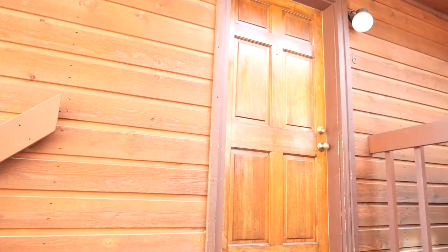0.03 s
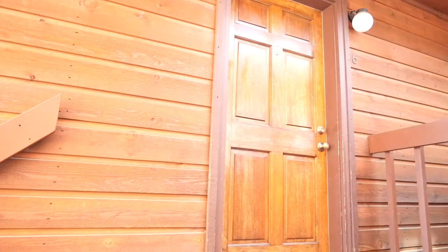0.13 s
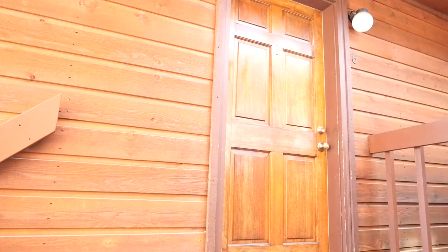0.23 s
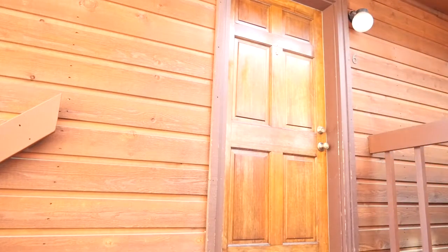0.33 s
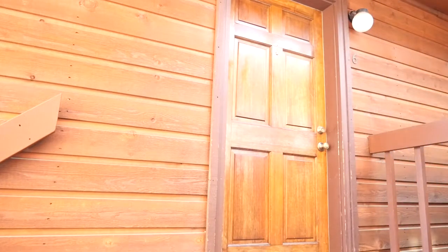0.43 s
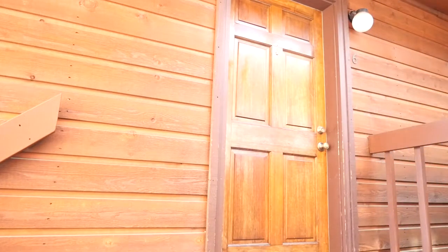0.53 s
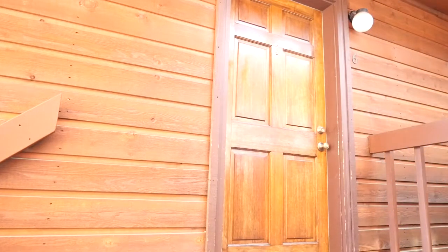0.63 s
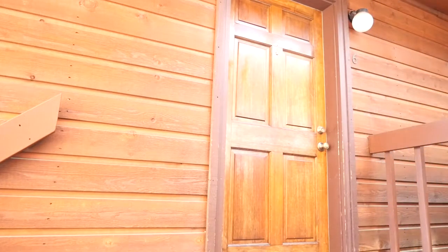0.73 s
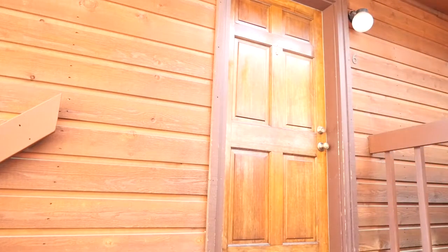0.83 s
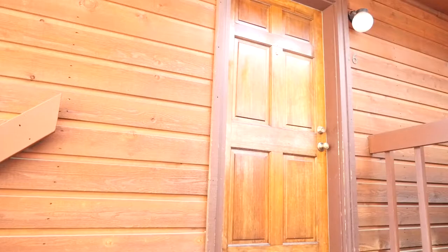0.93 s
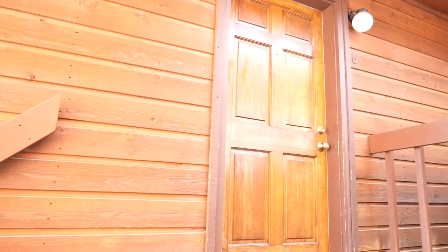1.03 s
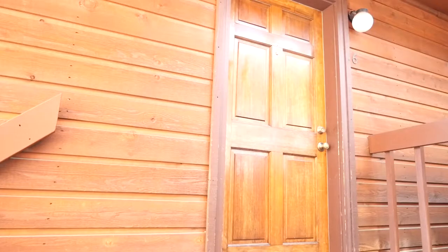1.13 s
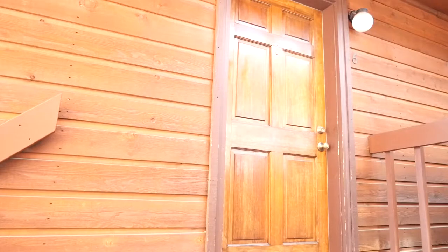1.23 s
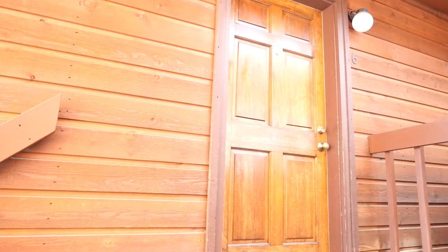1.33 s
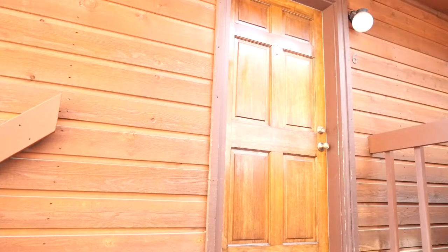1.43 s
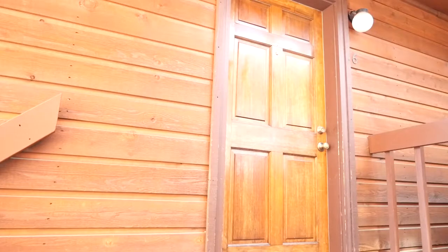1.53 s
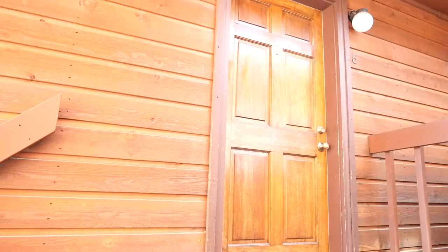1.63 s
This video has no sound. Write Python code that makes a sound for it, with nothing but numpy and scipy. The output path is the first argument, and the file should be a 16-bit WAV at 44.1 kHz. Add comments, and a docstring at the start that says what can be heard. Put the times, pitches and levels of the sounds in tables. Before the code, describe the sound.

One hard knock on a wooden front door at 0.2 seconds, close and loud enough to distort, its panels ringing briefly and latch chattering. Faint metallic clicks precede it from the start. A quieter grainy, rattling scrape runs from about 0.4 to 0.65 seconds. Soft muffled thumps and scuffs follow near 1.0, 1.2 and 1.5 to 1.7 seconds, over low steady noise and faint hum.

```python
"""One hard blow on a wooden door overloads the recorder: ringing tones for the panels, noise bursts for cracks and porch.
Just after it the latch chatters, as short bursts of noise each around one pitch.
Light metallic clicks come before the blow and again near the end; a grainy, rattling scrape follows the blow.
Soft thumps, one at the start and the rest late, and late scuffs are shaped noise; one thump leaves a hollow note.
Under it all lie a low steady noise, a faint wavering hum and two slight puffs of air."""
import sys
import numpy as np
from scipy import signal
from scipy.fft import rfft, irfft
from scipy.io import wavfile

SR = 44100
rng = np.random.default_rng(int(sys.argv[2]) if len(sys.argv) > 2 else 0)


def wav_record(signal):
    """Record a signal, one row per channel, as 16-bit PCM in the file named by sys.argv[1]."""
    frames = np.transpose(np.atleast_2d(signal))
    bounded = np.clip(frames, -1, 1)
    # unit amplitude maps onto the largest positive 16-bit level
    quanta = np.round(bounded * 32767).astype(np.int16)
    wavfile.write(sys.argv[1], SR, quanta)


N = 74970

# In every table, rise is the time to full strength and t60 the time to fade by 60 dB.
# Levels are those before the recorder's gain; spectrum levels only set the balance between pitches.

# blows on the door: (time [s], level [dB])
DOOR_BLOWS = [(.2110, 0), (0.2148, -9), (0.241, -15.5), (0.2492, -11.5)]
# tones of the ringing panels: (frequency [Hz], level before PANELS_DB [dB], t60 [s])
PANEL_TONES = [(238.7, -9.5, .25), (335, -6, .5), (404, -4.5, 0.48), (433, -7, .4), (523, -7.5, .35),
               (617, 2, .26), (650, -10, 0.78), (771, 0.5, .5), (800, -3, .5), (821, -4.5, 0.82),
               (912, -5, 0.76), (1020, -18, 0.29), (1256, -20, 1), (1567, -16, 0.54), (2262, -19, .3)]
# spectrum of the wood's crack: (frequency [Hz], level [dB])
CRACK_SPECTRUM = [(20, -65), (90, -41.5), (170, -17), (300, 0.5), (700, 1.5), (1400, -1), (2200, -7),
                  (4000, -27), (15000, -48)]
# spectrum of the porch ringing after the blow: (frequency [Hz], level [dB])
PORCH_SPECTRUM = [(20, -71), (100, -32.5), (160, -19.5), (280, -12), (390, -7), (500, -9), (690, -12.5),
                  (810, -8.5), (1140, -15), (1700, -21), (2800, -21), (3200, -14.5), (4000, -27),
                  (5500, -26.5), (7800, -26.5), (11000, -31.5), (15000, -39.5)]
# strikes of the latch: (time [s], level [dB], centre frequency [Hz])
LATCH_STRIKES = [(.2143, -9.5, 9800), (0.2216, -10, 3330), (0.2206, -7.5, 6850), (0.2256, -9, 5370)]
# light clicks of the hardware: (time [s], level [dB], brightness [dB per octave])
METAL_CLICKS = [(0.0, -35, -4), (.029, -40, -1.5), (0.065, -41, 0), (0.0898, -30, 1.5), (0.15, -40, 0.5),
                (0.159, -37.5, -2.5), (1.528, -44, -10), (1.665, -46, -11)]
# spectrum of the clicking metal: (frequency [Hz], level [dB])
METAL_SPECTRUM = [(10, -88.5), (300, -30.5), (900, -6.5), (1450, -7), (2000, -7), (3000, 1.5), (3450, -1.5),
                  (4300, -10), (6000, -4.5), (7100, -6.5), (9500, -14.5), (11200, -12.5), (13000, -19.5),
                  (15500, -20.5)]
# strokes of the scrape: (time [s], level [dB], rise [s], t60 before the release [s])
SCRAPE_STROKES = [(0.406, -22.5, 0.032, .5), (.453, -25, 0.007, 0.23), (0.509, -30, .01, 0.39),
                  (0.561, -34, 0.0049, 0.37)]
# spectrum of the scrape: (frequency [Hz], level [dB])
SCRAPE_SPECTRUM = [(150, -42), (320, 0.5), (550, -10), (920, -0.5), (1300, -8.5), (1900, -14.5),
                   (2600, -7.5), (3400, -7.5), (4400, -19.5), (5500, -15), (6000, -15.5), (6500, -17),
                   (8200, -16.5), (9500, -25.5), (11000, -22.5), (15500, -34)]
# narrow rings of rubbed hardware and wood: (time [s], level [dB], rise [s], t60 [s], pitch [Hz])
RUBBED_RINGS = [(0.0, -41.5, 0.011, .35, 3200), (.148, -40.5, .015, .2, 3450),
                (0.44, -36, 0.018, 0.4, 5960), (0.478, -43.5, 0.14, 0.25, 6080),
                (.44, -29, 0.017, 0.2, 3400), (0.456, -37, 0.048, 0.52, 3450),
                (.415, -28, 0.011, 0.26, 1000), (0.51, -40, 0.09, 0.33, 800),
                (0.485, -37, 0.083, 0.41, 318), (1.505, -50, 0.024, 0.42, 3550),
                (1.66, -44, 0.0083, 0.11, 2750)]
# soft far thumps: (time [s], level [dB], rise [s], t60 [s], brightness [dB per octave])
FAR_THUMPS = [(0.0, -35, 0.0024, 0.28, 0), (1.019, -33, 0.016, 0.46, 1), (1.192, -34, 0.0076, 0.31, -3.5),
              (1.515, -37, 0.0098, 0.63, 1.5), (1.57, -35, .008, 0.34, 2.5), (1.665, -45, .01, .4, 5.5)]
# spectrum of the thumps: (frequency [Hz], level [dB])
THUMP_SPECTRUM = [(20, -45.5), (70, -17.5), (140, -4.5), (350, 6), (620, -7.5), (900, 0.5), (1250, -10.5),
                  (2500, -28), (5000, -40.5), (15000, -61)]
# far scuffs: (time [s], level [dB], rise [s], t60 [s])
FAR_SCUFFS = [(1.02, -57, .04, .6), (1.16, -49, 0.031, .35), (1.475, -47.5, 0.028, .5),
              (1.515, -48, .015, 0.83), (1.65, -48.5, 0.021, .7)]
# spectrum of the scuffs: (frequency [Hz], level [dB])
SCUFF_SPECTRUM = [(500, -21), (1500, 4), (2600, 1.5), (3700, -1), (5000, -5.5), (7000, -12.5),
                  (10000, -15.5), (15000, -20)]
# hollow note that swells from one far thump: (time [s], level [dB])
HOLLOW_SWELL = [(1.015, -69), (1.045, -36), (1.078, -30), (1.1, -45.5), (1.17, -69)]
# spectrum of the steady background: (frequency [Hz], level [dB])
BACKGROUND_SPECTRUM = [(12, -26.5), (20, 4), (38, -10.5), (64, -10.5), (85, -10.5), (140, -8.5), (238, -5),
                       (306, -15.5), (393, -9), (519, -13.5), (565, -11), (857, -12.5), (1070, -15),
                       (1160, -19), (1580, -25), (1820, -25.5), (2610, -29), (2920, -31.5), (15500, -52.5)]
# faint hum: (frequency [Hz], level [dB])
HUM_BANDS = [(59, -54), (130, -51), (152, -52), (880, -51.5)]
# puffs of air on the microphone: (time [s], level [dB], rise [s], t60 [s])
AIR_PUFFS = [(.33, -38, 0.024, .4), (1.03, -39, 0.084, 0.7)]
# spectrum of a puff: (frequency [Hz], level [dB])
PUFF_SPECTRUM = [(5, -3), (18, 1), (35, -7), (70, -13), (200, -50), (2000, -92)]

CRACK_DB, CRACK_T60_S = -3.5, 0.042
PANELS_DB = -15
PORCH_DB, PORCH_RISE_S, PORCH_T60_S = -11.5, 0.0061, 0.57
DOOR_LOW_HZ = 210  # the door's sound is cut below this
LATCH_T60_S, LATCH_OCTAVES = 0.015, 0.34
CLICK_T60_S, CLICK_SNAP_DB = 0.31, -2
GRAIN_DB, GRAIN_PER_S = 0.5, 740  # typical size and rate of the uneven catching
SCRAPE_STOP_S, SCRAPE_RELEASE_T60_S = 0.642, 0.7
RING_OCTAVES = .033
HOLLOW_HZ = 447
BACKGROUND_DB = -42
DRIVE_DB, TOP_HZ = 1, 15700  # the recorder's gain and upper limit

T = np.arange(N) / SR  # time of each sample [s]
FREQS = np.maximum(np.fft.rfftfreq(N, 1 / SR), 1)  # kept above zero for the logarithms

# peaks and dips of many small resonances: depth, spacing, and the pitch below which they shrink
RIPPLE_DB, RIPPLE_HZ, RIPPLE_FROM_HZ = 2, 29.89, 1300
RIPPLE = np.interp(FREQS / RIPPLE_HZ, np.arange(4000), rng.standard_normal(4000))
RIPPLE = RIPPLE * np.minimum(FREQS / RIPPLE_FROM_HZ, 1) ** 2


def amp(db):
    """Turn decibels into a multiplier."""
    return 10 ** (np.asarray(db) / 20)


def noise(db):
    """Noise of average strength (rms) 1, with the given balance of frequencies."""
    x = irfft(rfft(rng.standard_normal(N)) * amp(db), N)
    return x / x.std()


def colour(points, tilt_db=0, ripple_db=0):
    """Dense resonances: noise that follows a spectrum table, tilted per octave and rippled."""
    hz, db = np.array(points).T
    smooth = np.interp(np.log(FREQS), np.log(hz), db)
    return noise(smooth + tilt_db * np.log2(FREQS) + ripple_db * RIPPLE)


def band(hz, octaves):
    """Noise gathered around one resonance."""
    distance = np.log2(FREQS / hz) / octaves
    return noise(-20 * np.log10(1 + distance ** 2))


def envelope(start, rise, t60):
    """A straight rise, then a smooth fade of 60 dB in t60 seconds."""
    age = T - start
    attack = np.clip(age / max(rise, 1e-4), 0, 1)
    return attack * np.exp(-np.log(1000) * np.maximum(age - rise, 0) / t60)


def grain():
    """Quick uneven catching of two rubbing surfaces, as random changes of level."""
    wobble = np.interp(T * GRAIN_PER_S, np.arange(N), rng.standard_normal(N))
    gain = amp(GRAIN_DB * wobble)
    return gain / np.sqrt(np.mean(gain ** 2))


def door():
    """Each blow cracks the wood; the first sets the panels and the porch ringing."""
    start = DOOR_BLOWS[0][0]
    cracks = sum(amp(CRACK_DB + db) * envelope(s, 0.00046, CRACK_T60_S) * colour(CRACK_SPECTRUM)
                 for s, db in DOOR_BLOWS)
    # each tone starts at a peak, pushed up or down at random
    panels = sum(amp(db) * rng.choice([-1, 1]) * np.cos(2 * np.pi * hz * (T - start))
                 * envelope(start, .001, t60) for hz, db, t60 in PANEL_TONES)
    porch = envelope(start, PORCH_RISE_S, PORCH_T60_S) * colour(PORCH_SPECTRUM, ripple_db=RIPPLE_DB)
    mix = cracks + amp(PANELS_DB) * panels + amp(PORCH_DB) * porch
    low_cut = signal.butter(3, DOOR_LOW_HZ, "high", fs=SR, output="sos")
    return signal.sosfilt(low_cut, mix)


def latch():
    """The latch strikes its plate several times just after the blow, each strike near one pitch."""
    return sum(amp(db) * envelope(s, .0004, LATCH_T60_S) * band(hz, LATCH_OCTAVES)
               for s, db, hz in LATCH_STRIKES)


def clicks():
    """Small metal contacts: a snap and its ring in the porch."""
    total = 0
    for s, db, tilt in METAL_CLICKS:
        ring = envelope(s, 0.0024, CLICK_T60_S)
        snap = amp(CLICK_SNAP_DB) * envelope(s, 0.00067, 0.0053)
        total = total + amp(db) * (ring + snap) * colour(METAL_SPECTRUM, tilt, RIPPLE_DB)
    return total


def scrape():
    """Grainy strokes that fade faster once the motion stops, with narrow rings of rubbed parts."""
    strokes = sum(amp(db) * envelope(s, rise, t60) * colour(SCRAPE_SPECTRUM, ripple_db=RIPPLE_DB)
                  for s, db, rise, t60 in SCRAPE_STROKES)
    release = amp(-60 * np.maximum(T - SCRAPE_STOP_S, 0) / SCRAPE_RELEASE_T60_S)
    rings = sum(amp(db) * envelope(s, rise, t60) * band(hz, RING_OCTAVES)
                for s, db, rise, t60, hz in RUBBED_RINGS)
    return grain() * (strokes * release + rings)


def far_movement():
    """Dull thumps and scuffs blurred by distance; one thump leaves a hollow note."""
    thumps = sum(amp(db) * envelope(s, rise, t60) * colour(THUMP_SPECTRUM, tilt)
                 for s, db, rise, t60, tilt in FAR_THUMPS)
    scuffs = sum(amp(db) * envelope(s, rise, t60) * colour(SCUFF_SPECTRUM, ripple_db=RIPPLE_DB)
                 for s, db, rise, t60 in FAR_SCUFFS)
    # silent outside the times in the table
    swell = amp(np.interp(T, *np.array(HOLLOW_SWELL).T, left=-np.inf, right=-np.inf))
    hollow = swell * np.sqrt(2) * np.sin(2 * np.pi * HOLLOW_HZ * T)
    return thumps + grain() * scuffs + hollow


def background():
    """Low steady noise, a hum that wavers because it is narrow noise, and slight puffs of air."""
    steady = amp(BACKGROUND_DB) * colour(BACKGROUND_SPECTRUM)
    hum = sum(amp(db) * band(hz, .05) for hz, db in HUM_BANDS)
    puffs = sum(amp(db) * envelope(s, rise, t60) * colour(PUFF_SPECTRUM)
                for s, db, rise, t60 in AIR_PUFFS)
    return steady + hum + puffs


def scene():
    """Add everything together at one microphone."""
    return (door() + latch() + clicks() + scrape() + far_movement() + background())[None]


def record(dry):
    """The recorder flattens peaks that are too strong, then cuts the highest treble."""
    clipped = np.clip(amp(DRIVE_DB) * dry, -1, 1)
    treble_cut = signal.ellip(10, .2, 70, TOP_HZ, fs=SR, output="sos")
    return signal.sosfilt(treble_cut, clipped)


dry = scene()
out = record(dry)
wav_record(out)
```